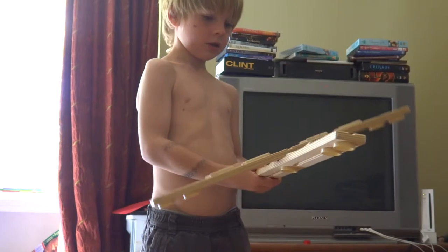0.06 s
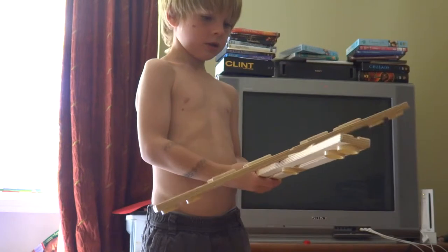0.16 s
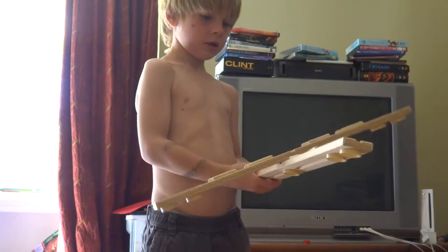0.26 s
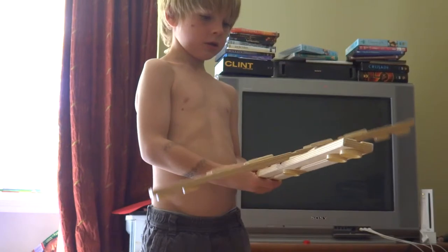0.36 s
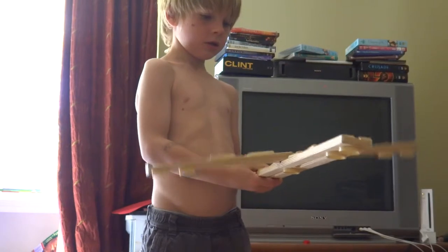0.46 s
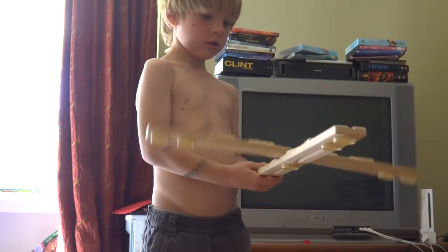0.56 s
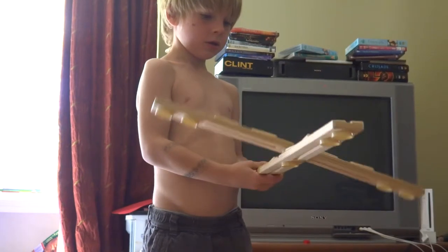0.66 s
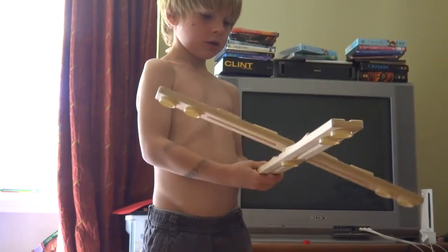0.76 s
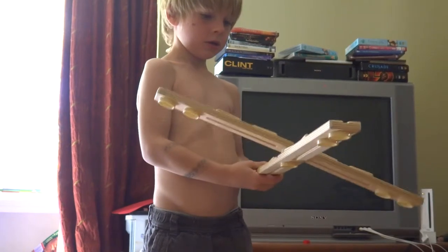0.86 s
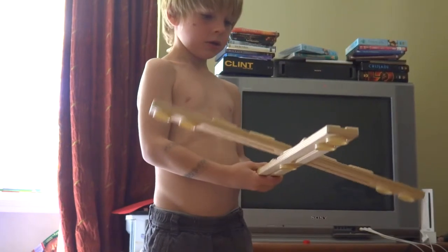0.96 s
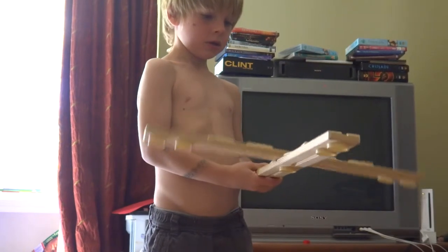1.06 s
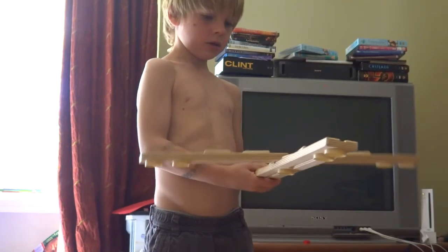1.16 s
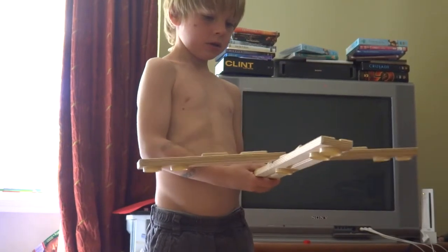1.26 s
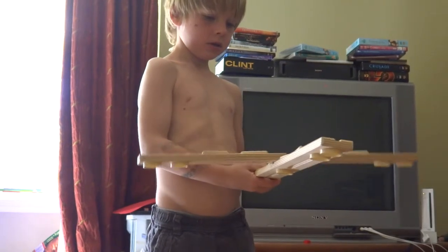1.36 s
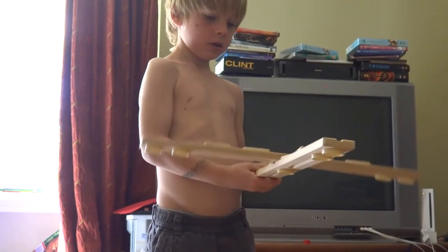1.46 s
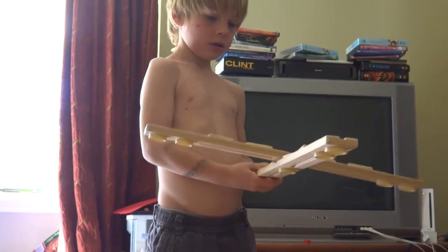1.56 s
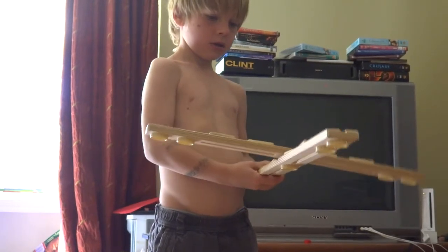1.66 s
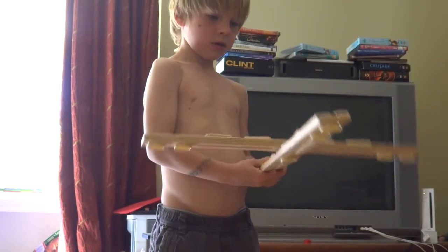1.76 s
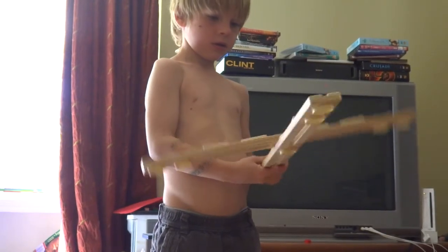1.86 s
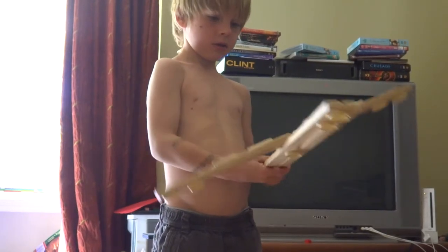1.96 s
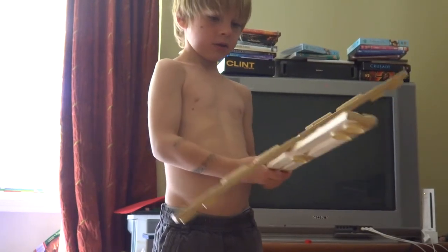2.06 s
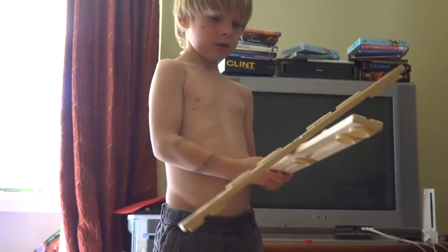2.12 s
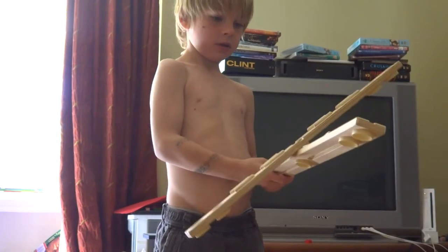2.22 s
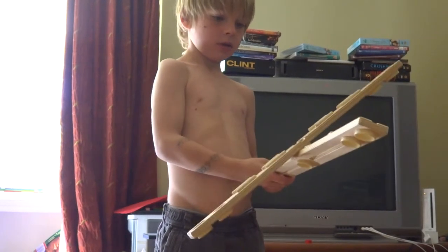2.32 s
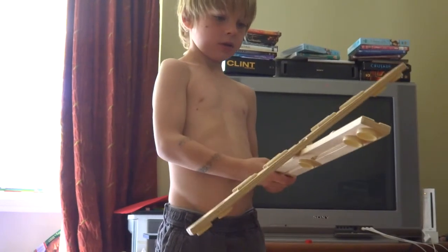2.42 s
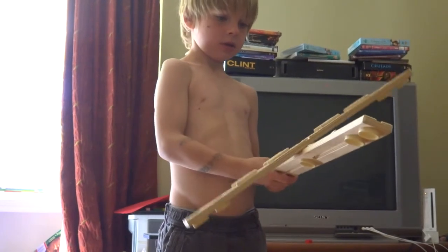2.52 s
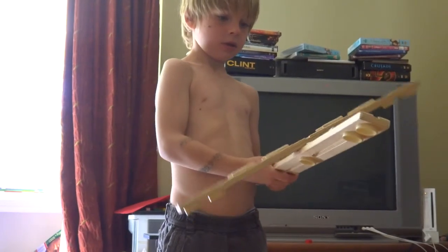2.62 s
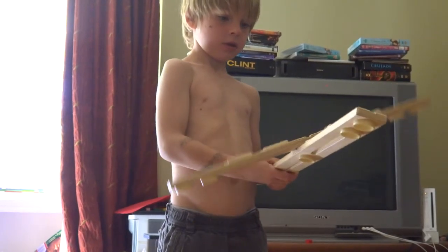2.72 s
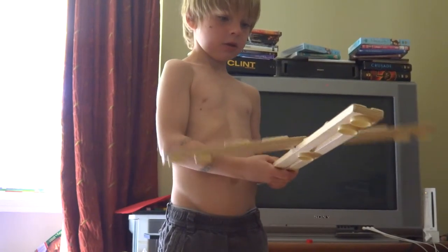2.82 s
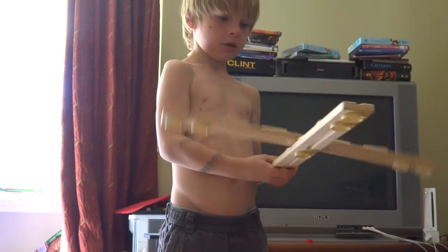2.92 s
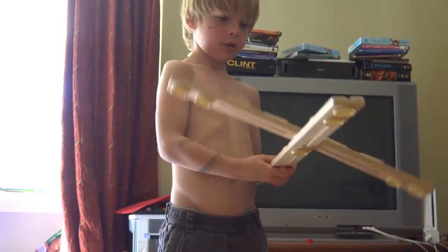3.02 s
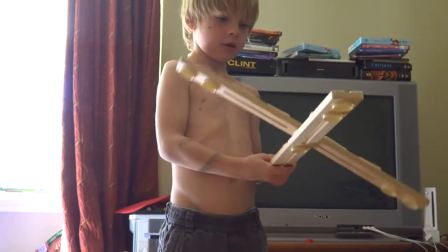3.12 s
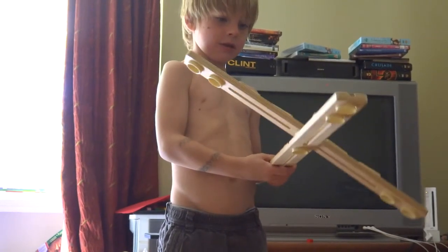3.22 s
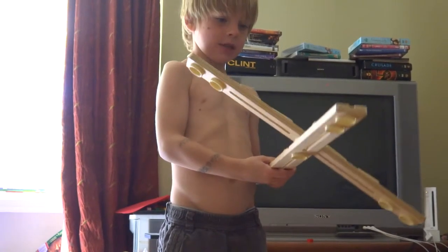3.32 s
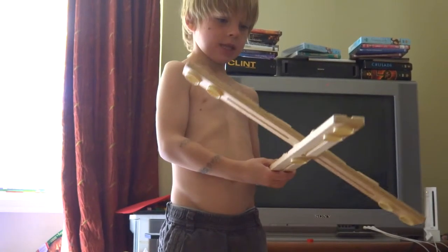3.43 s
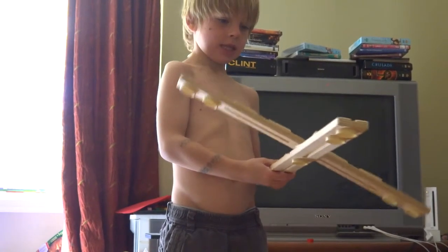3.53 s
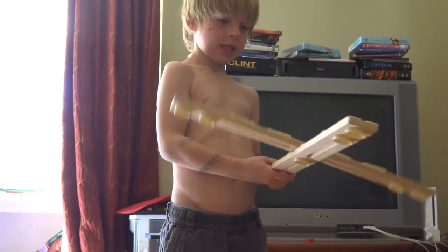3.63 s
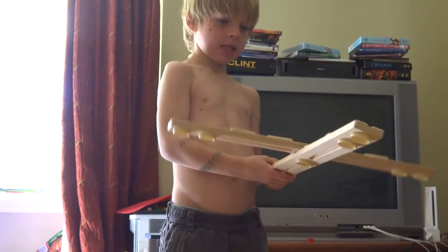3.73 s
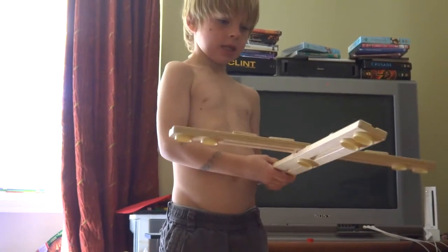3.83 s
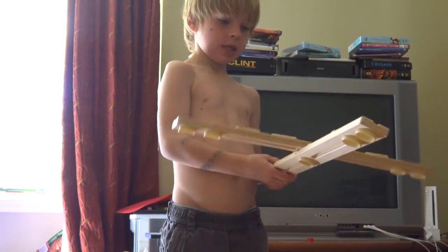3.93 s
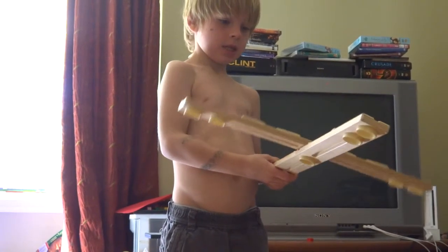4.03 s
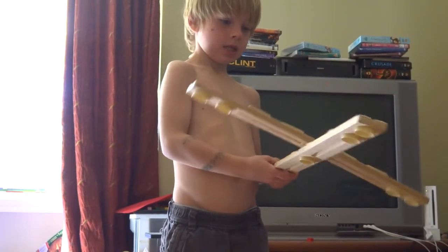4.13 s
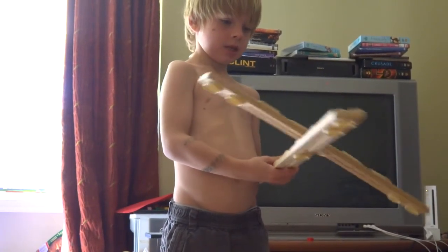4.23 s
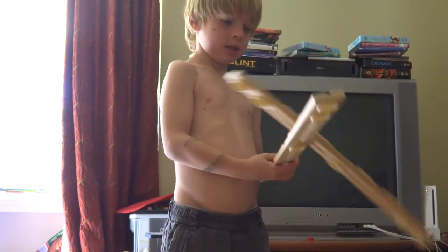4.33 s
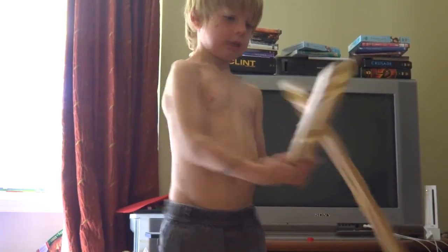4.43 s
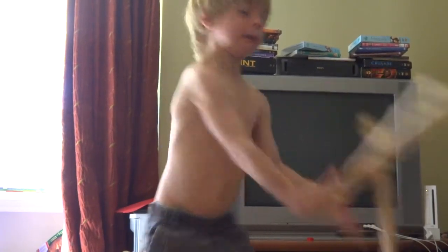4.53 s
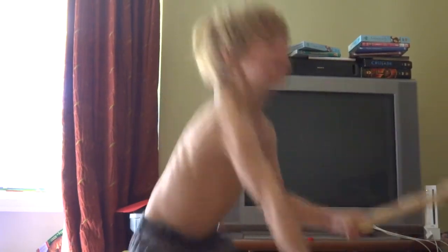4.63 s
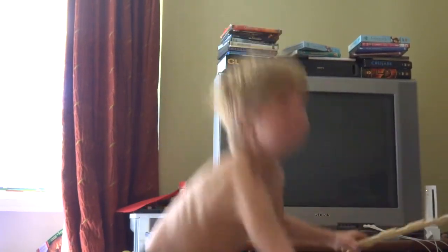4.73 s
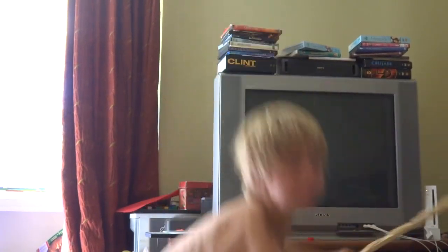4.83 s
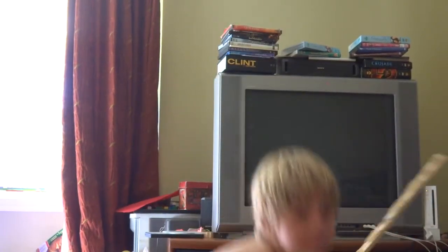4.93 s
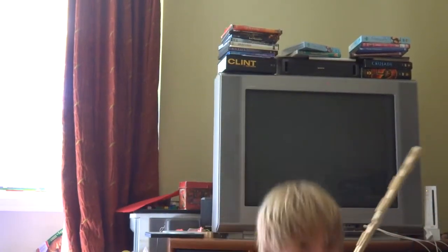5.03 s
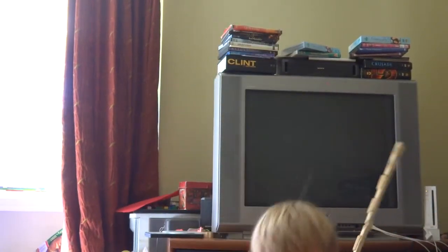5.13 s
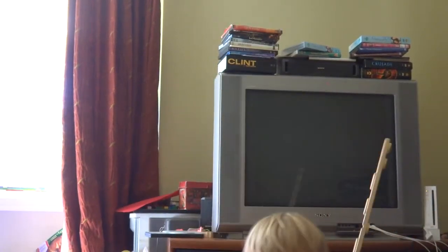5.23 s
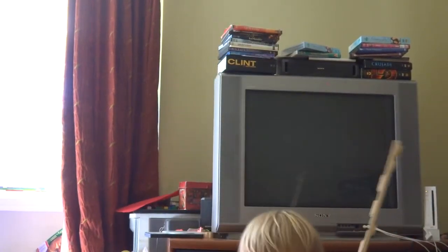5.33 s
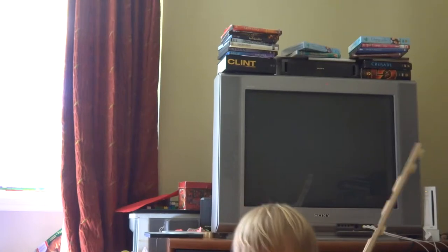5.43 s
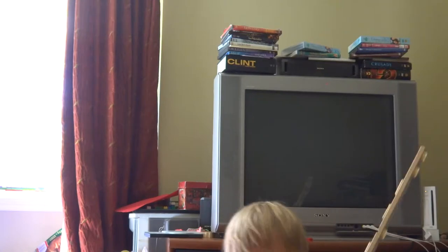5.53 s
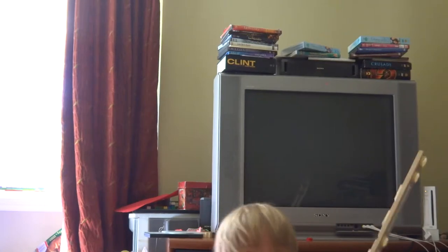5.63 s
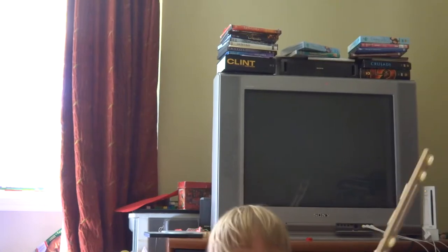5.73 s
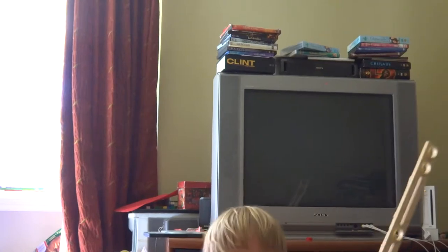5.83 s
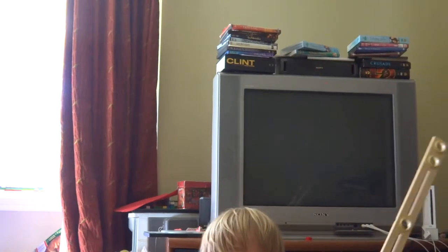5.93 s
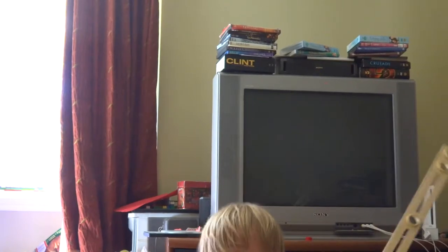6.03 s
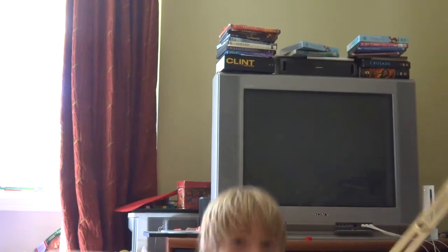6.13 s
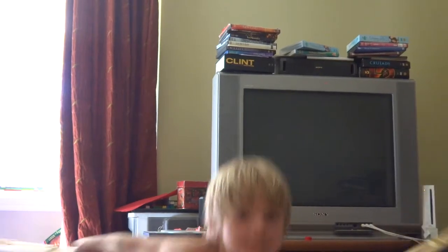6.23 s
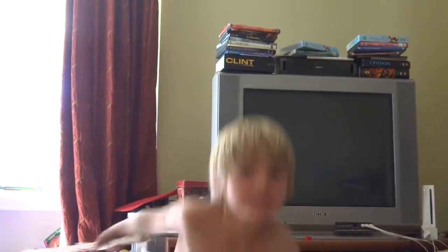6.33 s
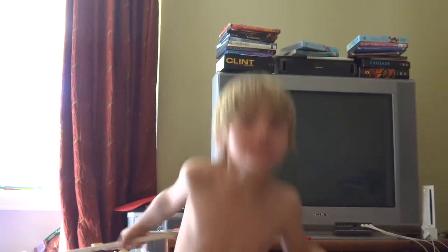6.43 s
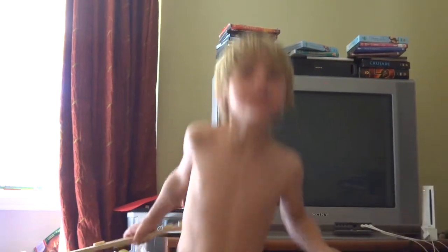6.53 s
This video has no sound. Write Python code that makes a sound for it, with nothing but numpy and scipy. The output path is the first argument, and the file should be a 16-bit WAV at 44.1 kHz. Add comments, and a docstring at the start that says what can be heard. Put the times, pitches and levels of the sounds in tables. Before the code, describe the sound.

Light wooden slats clack softly in pairs over camera hiss, then a scrape, heavy thump and loud wooden crash clattering across the floor, ending in dragging.

```python
"""A child rocks a long jointed wooden toy in a living room, over microphone hiss and a ticking lens motor.
At first the slats clack lightly as they tip: short bright pulses in pairs, with hollow decaying knocks.
Then a part slides off in rubbed noise, joints snap as dry high rings, and a heavy step thumps with low pushes.
The wood crashes to the floor and bounces: slaps, ringing slats and booming boards, held down by a limiter.
Last, the wood is dragged together in strokes of grating and hissing noise."""
import sys
import numpy as np
from scipy import signal
from scipy.fft import rfft, irfft
from scipy.io import wavfile
from scipy.ndimage import uniform_filter1d

SR = 44100
rng = np.random.default_rng(int(sys.argv[2]) if len(sys.argv) > 2 else 0)


def inscribe(sig):
    """Save sig as 16-bit PCM at rate SR to the path in sys.argv[1].

    A 1-D sig is mono; a 2-D sig holds one channel per row.
    Samples are clipped to [-1, 1] before scaling.
    """
    pcm = np.round(np.clip(np.atleast_2d(sig).T, -1, 1) * 32767)
    wavfile.write(sys.argv[1], SR, pcm.astype(np.int16))


N = 289692
TIME = np.arange(N) / SR  # seconds through the scene
AGE = TIME[:2 ** 15]  # seconds since a hit

# All levels are ahead of the limiter and the output balance in record().
# an even spectrum: frequency_hz, level_db (per Hz)
FLAT = [(20, 0), (20000, 0)]
# microphone hiss and room air: frequency_hz, level_db (per Hz, before scaling to HISS_DB)
HISS_COLOUR = [(20, -9), (60, 4.5), (110, -1), (220, -3.5), (450, -6.5), (1200, -2), (2000, -15.5),
               (2650, -9.5), (3150, 1.5), (3900, -10), (5500, -12), (6600, -1.5), (8000, 0.5), (8700, -4),
               (9550, 5), (10300, -3.5), (11000, -7.5)]
HISS_DB = -49.5  # rms
# correlation of the hiss at the two microphones: frequency_hz, likeness (0 to 1)
HISS_LIKENESS = [(60, 1), (110, 0.65), (190, 0.59), (350, 0.013), (1100, 0.015), (2000, .12), (3600, 0.073),
                 (6500, 0.61), (11000, 0.83)]
# correlation of room and rubbing sound at the two microphones: frequency_hz, likeness (0 to 1)
ROOM_LIKENESS = [(50, 0.94), (250, 1), (500, 0.75), (1000, 0.92), (2000, 0.28), (4000, 0.52), (6500, 0.85),
                 (8500, 0.38), (11000, 0.95)]
# decay of the room's tail: frequency_hz, t60_s
ROOM_T60 = [(80, 0.15), (250, 0.31), (600, 0.22), (2500, 0.26), (7000, 0.22), (11000, 0.2)]
# reflections off nearby surfaces: delay_s (varied a little per hit), level_db (against the tail)
ECHOES = [(.0075, -9.5), (.0098, -16), (0.0117, -12.5), (0.023, -26)]

PICTURES_PER_S = 29.97  # the camera's picture rate, which paces the lens motor
# lens motor ticks within each picture:
# pitch_hz, level_db (at zero effort), t60_s, delay_s (after the picture starts), effort_share (0 to 1)
LENS_TICKS = [(4780, -50, 0.032, .0122, 0.69), (4320, -61, 0.0096, 0.026, 0.33),
              (8000, -53, 0.026, 0.0071, 1), (9430, -45, 0.027, 0.023, 0.45),
              (4770, -59, 0.051, .023, 0.84), (7700, -41, 0.0052, .0278, 0.15),
              (7840, -43, 0.0082, .0278, 0.19), (9400, -43.5, 0.0063, 0.032, 0.66),
              (4486, -49, 0.012, 0.043, 0.067), (3230, -49.5, 0.009, 0.039, 0.28)]
# whine of the running focus motor: start_s, length_s, pitch_hz, level_db
LENS_WHINES = [(2.386, 0.23, 7730, -44.5), (3.977, 0.27, 7720, -44.5), (6.216, .08, 6770, -45),
               (6.34, 0.17, 5850, -54.5)]
# the motor hunting for focus: start_s, length_s, effort_db
LENS_HUNTS = [(0, 2.3, 2.4), (3.314, .68, 5.5), (6.2, .4, 2.5)]
LENS_IDLE_DB, LENS_RAMP_DB_PER_S = -5, 86

# wood pushed over wood or floor:
# start_s, swell_s, hold_s, grating_db (slat), hissing_db (edge), boards_db (floorboards)
STROKES = [(4.196, 0.21, 0.088, -29, -43, -67.5), (4.473, .03, 0.083, -43, -43, -45.5),
           (4.614, 0.03, 0.054, -38, -27.5, -56), (4.697, 0.053, 0.025, -33.5, -30.5, -41),
           (5.373, .2, 0.099, -35, -39.5, -46), (5.674, 0.066, .12, -39.5, -43, -49),
           (5.89, .22, 0.43, -51, -50, -97)]
STROKE_SWELL_DB, STROKE_SAG_DB_PER_S, STROKE_STOP_DB_PER_S = 24, 28.5, 233
# the floorboards go on shaking after the first landing
RUMBLE_DB, RUMBLE_RISE_S, RUMBLE_HOLD_S = -26, 0.025, 0.75
# colour of a grating slat: frequency_hz, level_db (per Hz)
SLIDE_COLOUR = [(200, -24), (800, -21), (1100, -0.5), (1500, 2), (2100, -1.5), (2700, -6), (4000, 4.5),
                (5300, 7.5), (6500, 8), (8500, -3.5), (11000, -1.5)]
# colour of a hissing edge: frequency_hz, level_db (per Hz)
SKID_COLOUR = [(500, -33), (3500, -47), (6000, -4.5), (7500, 1.5), (8600, -4), (10000, 4), (11000, -5.5)]
# colour of stirred floorboards: frequency_hz, level_db (per Hz)
SHUFFLE_COLOUR = [(25, -13), (50, 4.5), (120, -11), (210, 8), (310, 0.5), (480, -6.5), (850, -11),
                  (1500, -14), (4000, -31.5)]
# resonances of a rubbed slat: pitch_hz, level_db (relative), t60_s
RUB_MODES = [(888, -10, 0.068), (1140, -6.5, 0.028), (1897, 0, 0.035), (2160, 0, 0.027), (3070, 7, 0.0096),
             (3600, 0, 0.02), (4800, -2, 0.0044), (6080, -1, 0.0098)]

# low pushes of the heavy step shaking the camera: start_s, level_db, pitch_hz, swell_s
THUMPS = [(4.735, -9, 140, 0.0016), (4.738, -23.5, 273, 0.0057), (4.753, -13, 44, 0.012),
          (4.758, -16, 100, 0.017), (4.768, -22.5, 272, 0.0032)]

# slat tips onto slat, one edge then the other:
# start_s, level_db (first edge), dull_hz (rolled off above), thin_hz (rolled off below), second_edge_delay_s
CLACKS = [(0.569, -35.5, 8560, 1610, 0.0096), (.878, -48.5, 5550, 454, 0.0072),
          (1.118, -54.5, 3020, 1210, .004), (1.486, -54.5, 3460, 1110, 0.0037),
          (1.895, -37, 7800, 1630, 0.0099), (2.948, -27, 9100, 1830, 0.0078),
          (3.692, -45.5, 3900, 1300, .004), (4.273, -41.5, 6160, 1030, 0.0047),
          (4.329, -25.5, 5100, 1340, 0.0065), (4.486, -27, 9500, 554, 0.008),
          (4.533, -39.5, 11900, 890, .002), (4.58, -34.5, 9800, 404, 0.0044),
          (4.744, -32, 10000, 1200, 0.0091), (5.555, -33.5, 9500, 695, .015),
          (5.603, -38.5, 5000, 730, 0.0027), (6.179, -54, 8050, 2660, 0.0036)]
SECOND_EDGE_DB = -3  # against the first edge
# the softer a clack, the less its crack stands out of the room's sound
FIRM_DB, FIRM_ROOM_DB, SMEAR_DB_PER_DB = -32, 0.13, 0.33
# hollow knocks of a whole slat: start_s, level_db, pitch_hz, t60_s
KNOCKS = [(.876, -45, 820, 0.021), (0.88, -41.5, 3067, 0.059), (1.118, -54, 1620, 0.02),
          (1.895, -48, 1720, 0.04), (2.378, -53.5, 458, 0.0034), (2.515, -51.5, 136, 0.022),
          (4.487, -32.5, 1747, 0.093), (4.622, -31.5, 1310, 0.014), (4.628, -36, 670, 0.01),
          (5.57, -33, 2013, 0.039), (5.604, -42, 2120, 0.039)]
# sharp dry snaps of the joints: start_s, level_db, pitch_hz
SNAPS = [(4.485, -29, 9930), (5.4205, -29.5, 9370), (5, -41.5, 7040), (4.7435, -31, 6450),
         (5.054, -27.5, 10000), (5.5553, -30, 9240), (5.583, -25.5, 9250), (5.857, -46, 8750)]
# colour of a light clack: frequency_hz, level_db (per Hz, relative)
CLACK_COLOUR = [(150, 21), (800, 0), (1750, 3), (2400, -2), (3200, 4), (4000, 1), (5000, 5), (6400, 6),
                (7400, 5), (8500, -3.5), (9600, 3.5), (11000, -11)]

# wood lands on the floor: start_s, slap_db (flat), hollow_db (slat ring), boom_db (floor), first_hop_s (nominal)
LANDINGS = [(4.815, 3.5, -24, -18.5, .022), (4.888, -9.5, -38, -31, .034), (4.964, -29, -15.5, -24, .013),
            (5.046, -20, -32, -39, .007), (5.068, -13.5, -22, -25, .024), (5.15, -58, -29, -27, .02),
            (5.178, -21, -24.5, -34, .014), (5.295, -46, -43.5, -43, .01)]
HOP_SHRINK, HOP_LOSS_DB = 0.8, 5.5  # from one hop to the next
LANDING_ROOM_DB = 3.5
# colour of a flat slap: frequency_hz, level_db (per Hz, relative)
SLAP_COLOUR = [(100, -18.5), (500, -9), (850, -6.5), (1500, -6.5), (2400, -1.5), (3400, -3), (4350, 2.5),
               (4900, 2), (5800, 4), (7200, 2), (8400, -6.5), (9600, 0.5), (11000, -9.5)]
# colour of a hollow slat: frequency_hz, level_db (per Hz, relative)
HOLLOW_COLOUR = [(60, -10.5), (200, 15), (500, 2), (900, 5.5), (1900, 6), (2800, -6), (6000, -4.5),
                 (11000, -36)]
# colour of the dull push on the floorboards: frequency_hz, level_db (per Hz, relative)
BOOM_COLOUR = [(50, -14), (120, -11.5), (175, -4.5), (290, 2), (400, -8.5), (550, -10), (1500, -44)]
# high bending modes of the wood: pitch_hz, level_db (relative), t60_s
SLAP_MODES = [(3070, 7.5, 0.1), (3340, -2, 0.07), (4370, 8, 0.12), (4350, 8, 0.14), (5300, 0, 0.14),
              (5850, 2, 0.12), (6100, 12.5, 0.11), (6100, 8, 0.17), (6820, 7, 0.088)]
# ring of the fallen slats: pitch_hz, level_db (relative), t60_s
SLAT_MODES = [(644, -5, 0.19), (824, 2, 0.24), (862, 3, 0.11), (877, 0, 0.056), (927, 0, 0.16),
              (1066, 9.5, 0.077), (1235, -10, .12), (1527, 12, 0.078), (1750, 0, 0.084), (1826, 4, 0.14),
              (2066, 7.5, 0.12)]
# ring of the floorboards: pitch_hz, level_db (relative), t60_s
FLOOR_MODES = [(174, -8, 0.19), (207.6, 5, 0.16), (215.5, -11, 0.28), (242, -0.5, 0.28), (285, 7, 0.21),
               (330, -7, 0.11), (400, -1.5, 0.195)]

# output balance of the two microphones: frequency_hz, left_minus_right_db
BALANCE_DB = [(60, 0.53), (250, -0.51), (500, 1), (1000, 0.33), (2000, -1.8), (4000, -0.99), (8000, 0.87),
              (11000, 0.87)]
EDGE_HZ = 11170  # top of the output band


def amp(db):
    """Decibels to gain."""
    return 10 ** (np.asarray(db) / 20)


def read(points, hz):
    """Reads a table on a log-frequency axis."""
    f, value = np.transpose(points)
    return np.interp(np.log(hz + 1), np.log(f), value)


def evened(x):
    """Scales to rms 1."""
    return x / np.sqrt(np.mean(x ** 2) + 1e-20)


def blow(x):
    """Scales a hit to the energy of 10 ms at rms 1."""
    return x * np.sqrt(SR / 100 / np.sum(x ** 2))


def add(mix, s, sound):
    """Mixes a sound in at time s."""
    part = mix[..., max(round(s * SR), 0):][..., :sound.shape[-1]]
    part += sound[..., :part.shape[-1]]


def diffuse(pair, colour, likeness=ROOM_LIKENESS):
    """Colours two unrelated signals and makes them as alike as two close microphones hear them."""
    hz = np.fft.rfftfreq(pair.shape[1], 1 / SR)
    same = np.clip(read(likeness, hz), 0, 1)
    mid, side = rfft(pair) * np.sqrt([1 + same, 1 - same]) * amp(read(colour, hz))
    return irfft([mid + side, mid - side], pair.shape[1])


def click(colour, dull_hz=1e6, thin_hz=1):
    """A causal pulse with the given spectrum; soft contact dulls it, a short slat thins it."""
    hz = abs(np.fft.fftfreq(len(AGE), 1 / SR)) + 1
    rolloff = np.sqrt((1 + (hz / dull_hz) ** 4) * (1 + (thin_hz / hz) ** 6))
    gain = amp(read(colour, hz)) / rolloff
    # minimum phase packs the energy at the start
    log_spectrum = np.conj(signal.hilbert(np.log(gain + 1e-4)))
    return blow(np.fft.ifft(np.exp(log_spectrum)).real)


def ring(hz, t60):
    """One dying mode."""
    return np.sin(2 * np.pi * hz * AGE) * np.exp(-np.log(1000) * AGE / t60)


def struck(modes):
    """A sum of dying modes; each point of contact excites them a little differently."""
    sizes = rng.choice([-1, 1], len(modes)) * rng.uniform(0.8, 1.2, len(modes))
    return blow(sum(size * amp(db) * ring(hz, t60) for size, (hz, db, t60) in zip(sizes, modes)))


def room_tail(build_s):
    """Diffuse noise that builds up at once and dies at its own rate in each frequency band."""
    noise = diffuse(rng.standard_normal((2, len(AGE))), FLAT)
    hz, t, bands = signal.stft(noise, SR, nperseg=256)
    decay = np.exp(-np.log(1000) * t / read(ROOM_T60, hz)[:, None])
    tail = signal.istft(bands * decay, SR, nperseg=256)[1][:, :len(AGE)]
    tail *= 1 - np.exp(-(AGE / build_s) ** 2)
    return tail / np.linalg.norm(tail[0])


def smear(scatter_s, scatter_db):
    """The direct sound: a spike and a brief scatter, as sound leaves various points along the slat."""
    direct = diffuse(rng.standard_normal((2, len(AGE))), FLAT) * AGE * np.exp(-2 * AGE / scatter_s)
    direct *= amp(scatter_db) / np.linalg.norm(direct[0])
    direct[:, 0] += 1
    spectrum = rfft(direct)
    # smearing in time colours the sound only mildly
    direct = irfft(spectrum / np.sqrt(abs(spectrum).mean(0) + 1e-9))
    direct /= np.linalg.norm(direct[0])
    return direct * (AGE < AGE[-1] / 2)


def room(x, room_db, build_s=0.0014, scatter_s=0.0014, scatter_db=9):
    """A hit as heard from its own spot: smeared along the slat, thrown back by furniture, then the room's tail."""
    tail = room_tail(build_s)
    direct = smear(scatter_s, scatter_db)
    for delay, db in ECHOES:
        add(tail, delay * rng.uniform(0.97, 1.05), amp(db) * direct)
    return signal.fftconvolve(x[None], direct + amp(room_db) * tail, axes=1)


def microphone_hiss():
    """Steady coloured noise, partly shared by the two microphones."""
    noise = rng.standard_normal((2, N))
    return amp(HISS_DB) * evened(diffuse(noise, HISS_COLOUR, likeness=HISS_LIKENESS))


def lens_effort(s):
    """How hard the focus motor works at time s, in dB: it idles, and works harder for each hunt."""
    hunts_db = [db - LENS_RAMP_DB_PER_S * max(start - s, s - start - length, 0)
                for start, length, db in LENS_HUNTS]
    return max(LENS_IDLE_DB, *hunts_db)


def lens(uneven_db=2, detune=0.011):
    """The focus motor ticks in step with the pictures, no two alike, and whines in bursts when it runs."""
    out = np.zeros(N)
    t = AGE[:1500]
    for start in np.arange(0, TIME[-1], 1 / PICTURES_PER_S):
        effort_db = lens_effort(start)
        for hz, db, t60, delay, share in LENS_TICKS:
            size, shift = rng.standard_normal(2)
            tick = np.sin(2 * np.pi * hz * (1 + detune * shift) * t) * np.exp(-np.log(1000) * t / t60)
            add(out, start + delay, amp(db + share * effort_db + uneven_db * size) * tick)
    for s, length, hz, db in LENS_WHINES:
        t = TIME[:int(length * SR)]
        bursts = np.sin(np.pi * PICTURES_PER_S * (s + t)) ** 2  # one burst a picture
        add(out, s, amp(db) * signal.windows.tukey(len(t)) * bursts * np.sin(2 * np.pi * hz * t))
    return out


def step(tilt_db=1):
    """Low pushes that swell and die within a few cycles, a little unlike at the two microphones."""
    out = np.zeros((2, N))
    phase = np.array([[0.18], [-0.18]])  # radians, left and right
    tilt = tilt_db * np.array([[0.5], [-0.5]])
    for s, db, hz, swell in THUMPS:
        envelope = AGE / swell * np.exp(1 - AGE / swell)
        push = -envelope * np.sin(2 * np.pi * hz * AGE + phase)
        add(out, s, amp(db + tilt) * push)
    return out


def stroke(start, swell_s, hold_s):
    """Gain of one movement: it gathers speed, slackens, and stops."""
    since_peak = TIME - start - swell_s
    swell_db = STROKE_SWELL_DB * np.minimum(since_peak / swell_s, 0)
    sag_db = STROKE_SAG_DB_PER_S * np.maximum(since_peak, 0)
    stop_db = STROKE_STOP_DB_PER_S * np.maximum(since_peak - hold_s, 0)
    return amp(swell_db - sag_db - stop_db)


def friction(gain, colour, catches_per_s, grain_db, ring_db, judder_db):
    """Rubbing: countless tiny slips and sparse catches of the grain, in uneven strokes, ring the slat."""
    catches = (rng.random(N) < catches_per_s / SR) * rng.standard_normal((2, N))
    slips = rng.standard_normal((2, N)) + amp(grain_db) * evened(catches)
    judder = evened(uniform_filter1d(rng.standard_normal(N), size=600))
    slips *= amp(judder_db * judder)
    ringing = signal.oaconvolve(slips, struck(RUB_MODES)[None], axes=1)[:, :N]
    return gain * evened(diffuse(evened(slips) + amp(ring_db) * evened(ringing), colour))


def rubbing():
    """Every stroke grates, hisses and stirs the floorboards, which also rumble on after the crash."""
    grating, hissing, boards = sum(
        amp(levels_db)[:, None] * stroke(start, swell_s, hold_s)
        for start, swell_s, hold_s, *levels_db in STROKES)
    rumble = amp(RUMBLE_DB) * stroke(LANDINGS[0][0], RUMBLE_RISE_S, RUMBLE_HOLD_S)
    floor = np.hypot(boards, rumble)
    slide = friction(grating, SLIDE_COLOUR, catches_per_s=400, grain_db=-9, ring_db=-7.5, judder_db=2.3)
    skid = friction(hissing, SKID_COLOUR, catches_per_s=300, grain_db=-8, ring_db=-11, judder_db=1.0)
    shuffle = friction(floor, SHUFFLE_COLOUR, catches_per_s=48, grain_db=-11.5, ring_db=-3.5, judder_db=3.5)
    return slide + skid + shuffle


def toy():
    """Slats clack and knock against each other, and their joints snap."""
    out = np.zeros((2, N))
    for s, db, dull_hz, thin_hz, second_s in CLACKS:
        room_db = FIRM_ROOM_DB + SMEAR_DB_PER_DB * (FIRM_DB - db)
        for delay, edge_db in (0, 0), (second_s, SECOND_EDGE_DB):
            clack = click(CLACK_COLOUR, dull_hz, thin_hz) + amp(-17) * struck(SLAP_MODES)
            add(out, s + delay, amp(db + edge_db) * room(clack, room_db))
    for s, db, hz, t60 in KNOCKS:
        # two faster-dying partials shape the onset
        knock = blow(ring(hz, t60) + ring(hz, t60 / 2) - ring(hz * 0.925, t60 / 2))
        add(out, s, amp(db) * room(knock, room_db=-2.0))
    for s, db, hz in SNAPS:
        snap = blow(ring(hz, t60=0.0064) + 0.11 * ring(hz * 0.91, t60=0.0018))
        add(out, s, amp(db) * room(snap, room_db=-10, scatter_s=0.00093))
    return out


def hops(s, hop_s, count=4):
    """A loose slat rebounds, its hops tending shorter and each contact weaker: (s, dB) of every contact."""
    for k in range(count):
        yield s, -HOP_LOSS_DB * k
        s += hop_s * HOP_SHRINK ** k * rng.uniform(0.9, 1.1)


def crash(hard_hz=13000, softening=0.43):
    """Each landing slaps, sets the slats ringing and booms in the floor; harder slaps are brighter."""
    out = np.zeros((2, N))
    hollow, push = click(HOLLOW_COLOUR), click(BOOM_COLOUR)
    for start, slap_db, hollow_db, boom_db, hop_s in LANDINGS:
        crack = click(SLAP_COLOUR, dull_hz=hard_hz * amp(softening * slap_db))
        for s, db in hops(start, hop_s):
            slap = blow(crack + amp(-11) * struck(SLAP_MODES))
            body = blow(hollow + amp(-6) * struck(SLAT_MODES))
            boom = blow(push + amp(1.5) * struck(FLOOR_MODES))
            contact = amp(slap_db) * slap + amp(hollow_db) * body + amp(boom_db) * boom
            add(out, s, amp(db) * room(contact, LANDING_ROOM_DB, scatter_s=0.0021, scatter_db=5.0))
    return out


def scene():
    """Hiss and lens motor, then the step, the rubbing, the toy and its fall."""
    return microphone_hiss() + lens() + step() + rubbing() + toy() + crash()


def record(dry, ceiling_db=-18.0, recovery_db_per_s=230, bass_hz=260, attack_s=0.0019):
    """The camera's fast limiter, less sensitive to bass, flattens the crash; then balance and band limit."""
    sensed = signal.sosfilt(signal.butter(1, bass_hz, "high", fs=SR, output="sos"), dry)
    keep = np.exp(-1 / (attack_s * SR))
    power = signal.lfilter([1 - keep], [1, -keep], (sensed ** 2).mean(0))
    power_db = 10 * np.log10(power + 1e-12)
    # the sensed level rises freely but falls no faster than the recovery rate
    fall = TIME * recovery_db_per_s
    level_db = np.maximum.accumulate(power_db + fall) - fall
    over_db = np.maximum(level_db - ceiling_db, 0)
    limited = dry * amp(-0.9 * uniform_filter1d(over_db, size=30))
    held = 0.65 * np.tanh(limited / 0.75)  # rounds off what slips by
    lean_db = read(BALANCE_DB, np.fft.rfftfreq(N, 1 / SR)) / 2
    held = irfft(rfft(held) * amp([lean_db, -lean_db]), N)
    band_limit = signal.firwin(301, EDGE_HZ, window=("kaiser", 7), fs=SR)
    return signal.oaconvolve(held, band_limit[None], "same")


dry = scene()
out = record(dry)
inscribe(out)
```